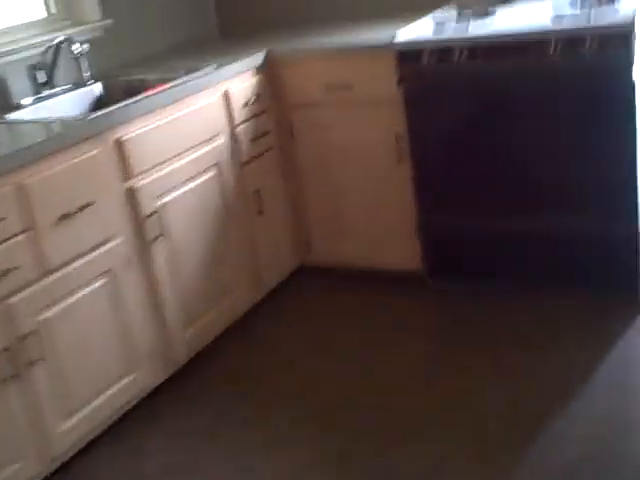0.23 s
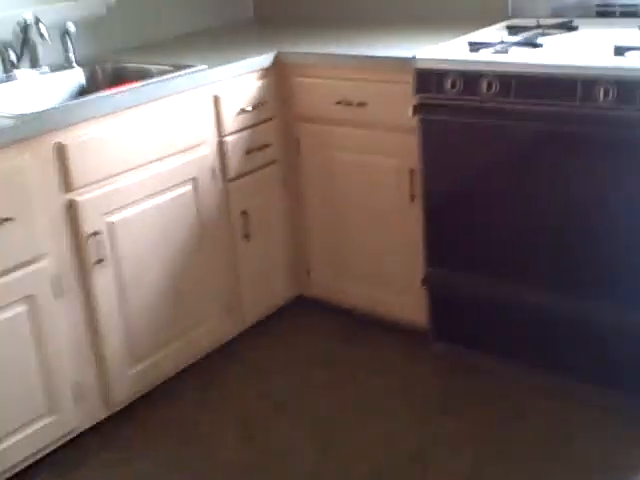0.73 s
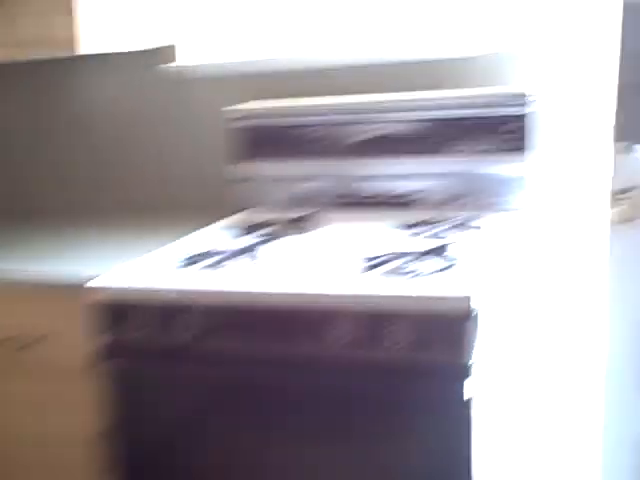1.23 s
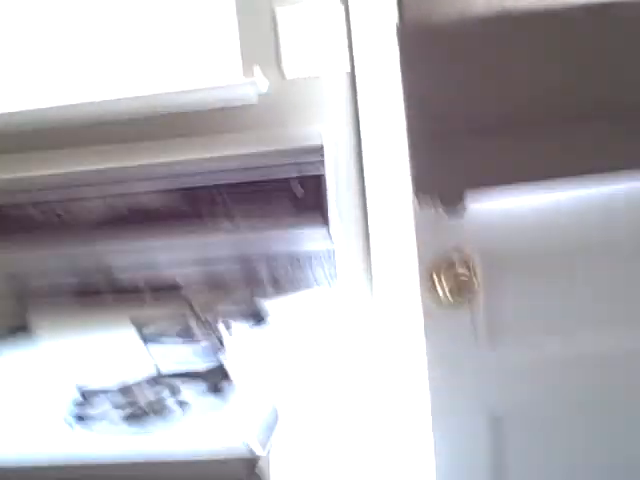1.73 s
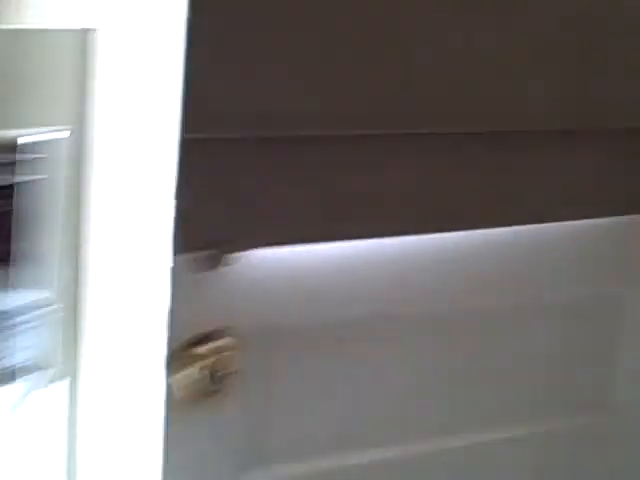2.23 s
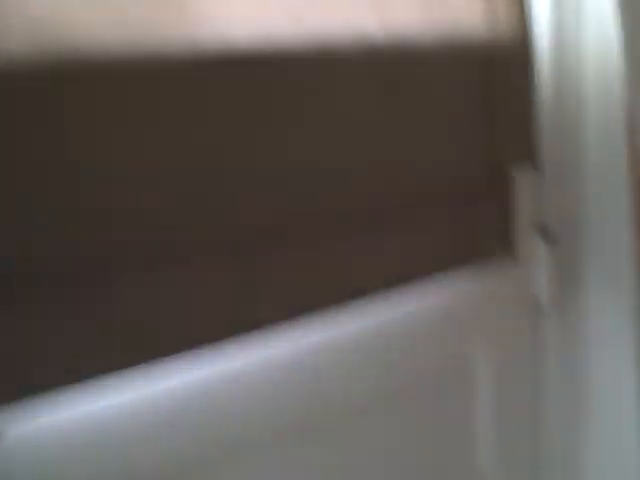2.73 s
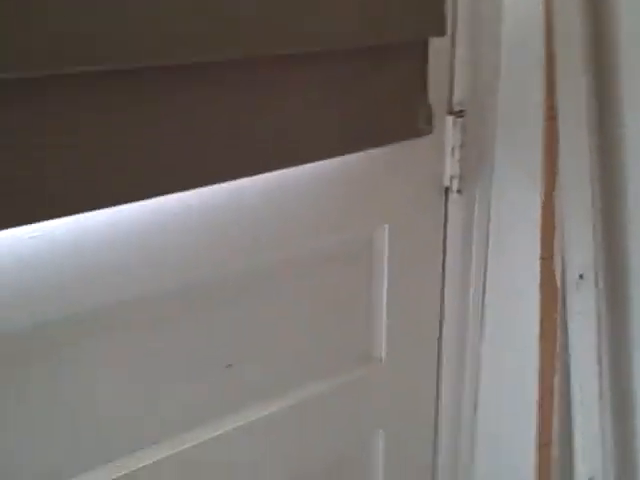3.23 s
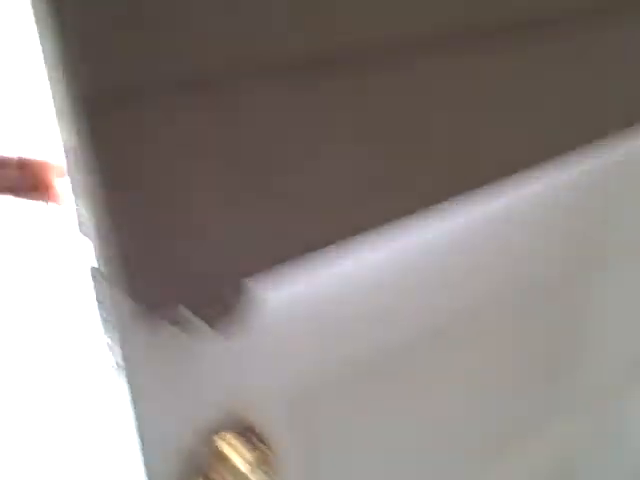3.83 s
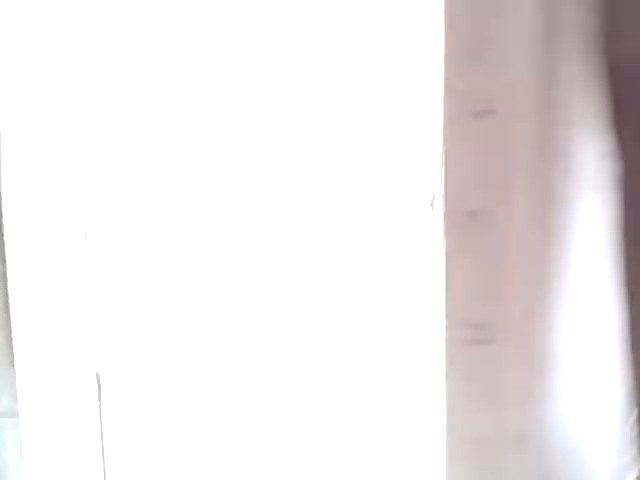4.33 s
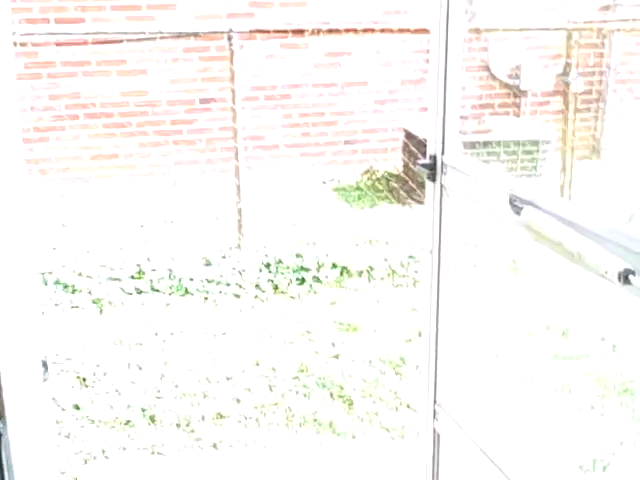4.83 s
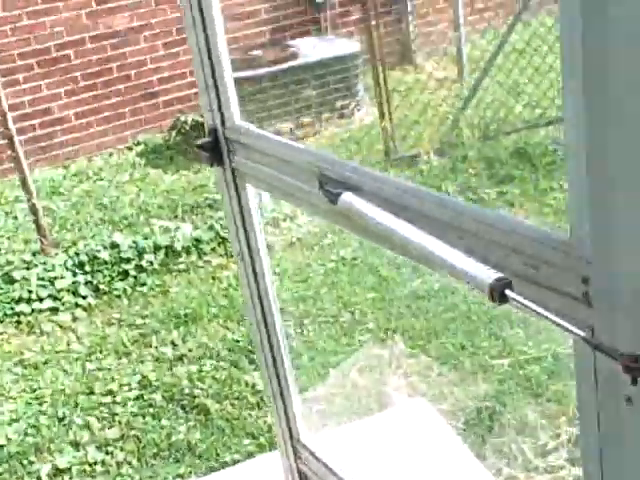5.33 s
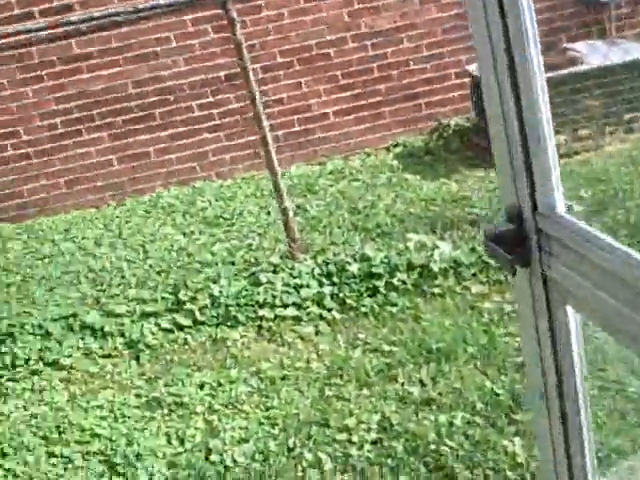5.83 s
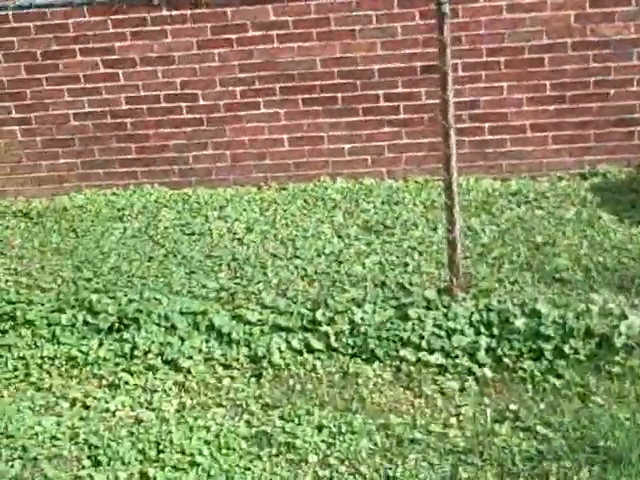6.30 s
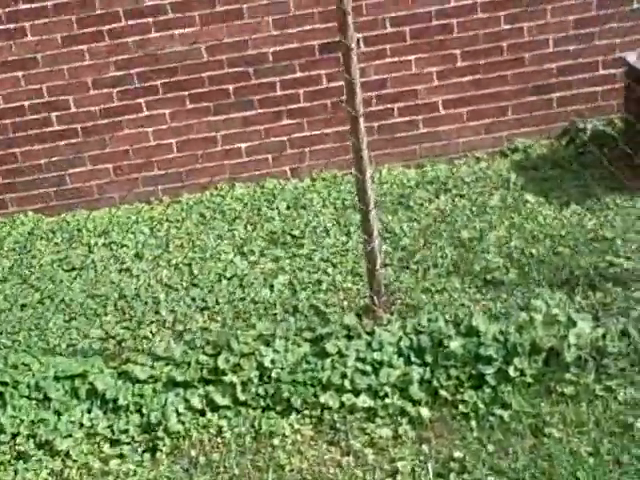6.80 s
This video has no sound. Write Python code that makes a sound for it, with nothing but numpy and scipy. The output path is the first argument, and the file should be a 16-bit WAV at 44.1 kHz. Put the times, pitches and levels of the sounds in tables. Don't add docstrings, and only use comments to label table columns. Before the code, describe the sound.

A door slams hard in an empty, echoing kitchen, footsteps knock over creaking boards, then gritty steps lead out into growing traffic and fan hum.

```python
import sys
import numpy as np
from scipy import signal
from scipy.fft import rfft, irfft, next_fast_len
from scipy.io import wavfile
from scipy.ndimage import uniform_filter1d, map_coordinates

SR = 44100
rng = np.random.default_rng(int(sys.argv[2]) if len(sys.argv) > 2 else 0)


def volts(x):
    e = np.asarray(x, float) / 20
    return 10 ** e


def digitize_waveform(pressure):
    field = np.atleast_2d(pressure).T
    bounded = np.clip(field, -1, 1)
    quanta = np.round(bounded * 32767).astype(np.int16)
    wavfile.write(sys.argv[1], SR, quanta)


N = 311346

# time_s, level_db
PASSAGE = [(0, -51.5), (.27, -64.5), (1.3, -58.5), (1.6, -60.5), (2.21, -62), (2.4, -51), (2.8, -57),
           (3.5, -54), (3.74, -54), (4.12, -54), (4.7, -50), (5.0, -45.5), (5.42, -51), (5.89, -50),
           (6.2, -55), (6.61, -55), (7.06, -48)]


def unit(x):
    return x / np.sqrt(np.mean(x ** 2) + 1e-20)


def along(points, hz):
    f, v = np.transpose(points)
    return np.interp(np.log(hz + 1), np.log(f + 1), v)


def curves(rows):
    s, *cols = np.transpose(rows)
    return [np.interp(np.arange(N) / SR, s, c) for c in cols]


def wobble(rate, size=N):
    knots = rng.standard_normal(int(N * rate / SR) + 4)
    return map_coordinates(knots, [np.arange(size) * rate / SR])


def coloured(x, gain):
    m = next_fast_len(len(x) + 8192)
    return irfft(rfft(x, m) * gain(np.fft.rfftfreq(m, 1 / SR)), m)[:len(x)]


def rush(spectrum, patchy_db):
    z = signal.stft(rng.standard_normal(N + 512), nperseg=512)[2]
    field = uniform_filter1d(rng.standard_normal(z.shape), 6, 0)
    field = uniform_filter1d(field, 14, 1)
    x = signal.istft(z * volts(patchy_db * unit(field)), nperseg=512)[1][:N]
    return unit(coloured(x, lambda hz: volts(along(spectrum, hz))))


def add(track, s, sound):
    part = track[round(s * SR):][:len(sound)]
    part += sound[:len(part)]


def fading_tone(t, db, hz, t60, attack):
    return -volts(db - 60 * t / t60) * np.sin(2 * np.pi * hz * t) * (1 - np.exp(-t / attack))


def strokes(rows):
    t = np.arange(N) / SR
    total = 0
    for s, db, rise, hold, fade in rows:
        climb_db = 20 * np.maximum(s - t, 0) / rise
        fall_db = fade * np.maximum(t - s - hold, 0)
        total = total + volts(db - climb_db - fall_db)
    return total


def hit(track, s, db, room_db, length, gain, attack=0.00081, ring=0):
    # pitch_hz, t60_s
    kitchen = [(60, 0.99), (150, 0.75), (500, 0.82), (2000, 0.84), (6000, 0.76), (14000, 0.56)]
    doorstep_s, outdoor_share = 4.5, 0.3
    t = np.arange(SR // 8) / SR
    x = coloured(rng.standard_normal(len(t)), gain)
    x = x * volts(-60 * t / length) * (1 - np.exp(-t / attack))
    x = x / np.abs(x).max() + ring
    hz, u, z = signal.stft(rng.standard_normal(SR), SR, nperseg=256)
    t60 = along(kitchen, hz)[:, None] * (1 if s < doorstep_s else outdoor_share)
    tail = coloured(signal.istft(z * volts(-60 * u / t60), SR, nperseg=256)[1], gain)
    tail *= volts(1.46 * wobble(71.6, size=len(tail)))
    tail *= 1 - np.exp(-np.arange(len(tail)) / SR / 0.0027)
    add(track, s, volts(db) * x)
    add(track, s, volts(db + room_db) * tail * np.linalg.norm(x) / np.linalg.norm(tail))


def rumble():
    # pitch_hz, level_db
    rumble_colour = [(26, -44), (45, -0.5), (73, 2.5), (130, -10.5), (170, -36), (290, -120)]
    calm_db, open_db, opens_s, opening_s = -59, 7, 2.6, 0.12
    t = np.arange(N) / SR
    level_db = calm_db + open_db / (1 + np.exp((opens_s - t) / opening_s))
    return volts(level_db + 2.1 * wobble(6)) * rush(rumble_colour, patchy_db=1.8)


def murmur():
    # pitch_hz, level_db
    murmur_colour = [(59, -31), (100, -3.5), (173, -0.5), (205, -3), (264, -2.5), (303, -4.5), (354, -8),
                     (399, -11), (450, -13), (580, -28), (990, -120)]
    level_db = curves(PASSAGE)[0]
    return volts(level_db + 0.78 * wobble(7.4)) * rush(murmur_colour, patchy_db=0.5)


def traffic():
    # time_s, level_db
    traffic_level = [(0, -64), (.1, -59), (.3, -66), (1.3, -58.5), (1.51, -64), (1.73, -57), (2.1, -62.5),
                     (2.34, -55), (2.6, -58.5), (2.9, -58), (3.3, -55), (3.6, -58.5), (4.12, -58.5),
                     (5.0, -51), (5.42, -53), (6.1, -51), (6.55, -50.5), (7.06, -44)]
    # pitch_hz, level_db
    traffic_colour = [(180, -43.5), (300, -19), (354, -3.5), (403, -29), (475, 1), (876, 2.5), (1060, 0),
                      (1730, -2.5), (2040, -5), (2560, -9.5), (5000, -30.5), (6500, -44), (11000, -120)]
    level_db = curves(traffic_level)[0]
    return volts(level_db + 0.23 * wobble(3.43)) * rush(traffic_colour, patchy_db=1.5)


def air_hiss():
    # pitch_hz, level_db
    air_colour = [(1470, -20), (2500, -6.5), (3380, -4.5), (4130, -3.5), (4970, -7), (7710, -13),
                  (9070, -17), (15800, -17)]
    middle_db, murmur_middle_db, follow = -67.5, -55, 0.31
    draught_s, draught_width_s, draught_db = 4.9, 0.77, 2.5
    t = np.arange(N) / SR
    level_db = middle_db + follow * (curves(PASSAGE)[0] - murmur_middle_db)
    level_db += draught_db * np.exp(-((t - draught_s) / draught_width_s) ** 2)
    return volts(level_db + 1.5) * rush(air_colour, patchy_db=1.5)


def drone():
    # time_s, pitch_hz, level_db
    drone_path = [(2.75, 295, -70), (2.9, 292, -52.5), (3.1, 278, -54.5), (3.3, 280, -60.5),
                  (3.45, 280, -55), (3.7, 278, -56.5), (3.95, 255, -58.5), (4.08, 270, -63.5),
                  (4.25, 272, -51), (4.45, 265, -54.5), (4.6, 268, -51.5), (4.8, 262, -55.5),
                  (5.0, 245, -58), (5.2, 272, -46.5), (5.35, 250, -60), (5.5, 255, -48), (5.7, 250, -57),
                  (5.9, 250, -75)]
    breath_hz, steady_share = 28, 1.1
    start = (0, drone_path[0][1], -120)
    end = (N / SR, drone_path[-1][1], -120)
    hz, level_db = curves([start, *drone_path, end])
    flutter = volts(2.2 * wobble(6.1))
    breathy = unit(wobble(breath_hz)) + 1j * unit(wobble(breath_hz)) + steady_share
    tone = (breathy * np.exp(2j * np.pi * np.cumsum(hz) / SR)).real
    return volts(level_db) * unit(flutter * tone)


def engine_hum():
    # time_s, pitch_hz, level_db
    engine_path = [(6.45, 143.6, -56), (6.494, 140, -52), (6.54, 157.1, -56), (6.65, 159.2, -54.5),
                   (6.806, 161.4, -51), (6.916, 163, -51.5), (7.06, 163.6, -50.5)]
    # pitch_multiple, level_db
    engine_orders = [(.5, -6), (1.5, -4.5), (3, -13)]
    hz, level_db = curves([(engine_path[0][0] - .2, engine_path[0][1], -90), *engine_path])
    phase = 2 * np.pi * np.cumsum(hz) / SR
    hum = sum(volts(db) * np.sin(k * phase) for k, db in [(1, 0), *engine_orders])
    return 1.44 * volts(level_db + .8 * wobble(13)) * hum


def insects():
    # time_s, level_db
    insect_level = [(4, -90), (4.5, -78), (5.0, -77), (5.8, -69.5), (6.3, -70.5), (6.8, -71.5), (7.06, -68)]
    chorus = rush([(5500, -30), (6600, -5), (7200, -6), (7780, 1), (8100, -5), (8700, -13),
                   (9400, -7), (10500, -30)], patchy_db=1.0)
    return volts(curves(insect_level)[0]) * chorus


def chirps():
    # start_s, length_s, pitch_hz, level_db
    calls = [
        (.1, 0.055, 4900, -72),
        (.3, 0.088, 5230, -71),
        (5.1, .06, 11000, -73),
        (5.3, .12, 12500, -77),
        (6.05, 0.092, 9200, -78),
        (6.268, 0.073, 9300, -73),
        (6.68, .15, 12200, -74),
        (3.3, .2, 11800, -73),
    ]
    out = np.zeros(N)
    for s, length, centre_hz, db in calls:
        n = round(length * SR)
        band = coloured(rng.standard_normal(SR // 4), lambda hz: np.exp(-((hz / centre_hz - 1) / 0.035) ** 2))
        add(out, s, volts(db) * unit(band)[:n] * np.hanning(n))
    return out


def sway():
    # centre_s, level_db, half_width_s
    swells = [(.13, -47, 0.06), (.9, -46, 0.54), (1.859, -43.5, 0.078), (2.3, -47.5, 0.29),
              (4.4, -52, 0.77), (4.78, -39, 0.18), (5.2, -45, 0.11), (5.4, -48, 0.065), (5.63, -55, 0.14),
              (5.95, -49, .08), (3.65, -51, 0.2), (6.3, -58, 0.3), (6.8, -56.5, 0.24)]
    calm_db = -60.5
    swing = rush([(8, -13.5), (16, -7.0), (26, -7.5), (40, -3.0), (60, -36.0), (90, -97.0)], patchy_db=0.3)
    t = np.arange(N) / SR
    level = volts(calm_db)
    level = level + sum(volts(db) * np.exp(-((t - s) / width) ** 2) for s, db, width in swells)
    return level * swing


def rustle():
    # full_s, level_db, rise_s, hold_s, fade_db_per_s
    brushes = [
        (5.8, -61, .05, .04, 80),
        (5.89, -59.5, .08, 0.059, 40),
        (3.31, -64.5, .15, .1, 62),
        (2.74, -54, .03, .03, 60),
        (1.5, -69, .05, .05, 80),
    ]
    # pitch_hz, level_db
    leaf_colour = [(1200, -28), (2200, 0), (3500, 0), (5000, -3), (6800, -7), (8500, -22), (12000, -40)]
    grain = volts(1.5 * wobble(90))
    return strokes(brushes) * unit(grain * rush(leaf_colour, patchy_db=2.0))


def scuffs():
    # full_s, level_db, rise_s, hold_s, fade_db_per_s
    drags = [(0, -62, 0.0092, 0.046, 35), (1.29, -61, 0.91, 0.022, 17), (1.98, -72, .06, 0.045, 123),
             (2.272, -59.5, 0.03, 0.18, 117), (2.674, -43.5, 0.012, 0.016, 85),
             (2.823, -56, 0.067, 0.017, 300), (3.36, -63.5, 0.12, 0.1, 395), (4.35, -70, 0.079, 0.041, 60),
             (4.532, -68, .04, .01, 140), (4.992, -62.5, .04, .02, 46), (5.572, -74, 0.063, .01, 117),
             (5.706, -57, .003, .012, 200), (5.826, -56, 0.12, .022, 300), (5.916, -58, 0.006, .012, 110),
             (6.64, -64.5, 0.11, 0.32, 100), (6.995, -57, .012, 0.061, 100)]
    # pitch_hz, level_db
    sole_colour = [(350, -18), (600, -13), (880, -5), (1050, 0), (1260, -6.5), (2030, -7.5), (2980, -4),
                   (6230, -10), (15800, -17.5)]
    grain = volts(1.5 * wobble(60))
    return strokes(drags) * volts(1.5) * unit(grain * rush(sole_colour, patchy_db=1.4))


def moans():
    # start_s, length_s, pitch_hz, level_db
    creaks = [
        (3.55, .25, 171, -55),
        (3.55, 0.25, 352, -54.5),
        (4.22, 0.24, 181.4, -59),
        (4.74, 0.16, 358, -49.5),
        (4.86, 0.47, 181, -50.5),
        (5.32, 0.14, 177, -46),
        (5.1, 0.21, 334, -57.5),
    ]
    out = np.zeros(N)
    for s, length, hz, db in creaks:
        u = np.arange(round(length * SR)) / SR
        rough = volts(2.5 * wobble(35, size=len(u)))
        tone = np.sin(2 * np.pi * hz * u * (1 - 0.052 * u))
        add(out, s, volts(db + 0.5) * rough * np.sqrt(np.hanning(len(u))) * tone)
    return out


def floor_bounce():
    # start_s, level_db, pitch_hz, t60_s
    bounces = [(0.128, -38, 62, 0.21), (1.114, -18, 25.5, 0.18), (1.707, -17.5, 27.7, 0.3),
               (1.8, -27.5, 11.3, 0.43), (2.3, -25, 23.6, 0.39), (2.367, -23, 21, 0.25),
               (2.722, -24, 24, 0.26), (2.869, -34.5, 60, 0.68), (2.922, -38, 89, 0.35),
               (4.759, -15, 42, 0.048), (4.959, -33, 19.3, 0.67), (5.785, -32, 34, .19)]
    out, t = np.zeros(N), np.arange(SR // 2) / SR
    for s, db, hz, t60 in bounces:
        add(out, s, fading_tone(t, db, hz, t60, 1 / (hz * 3.3)))
    return out


def steps():
    # start_s, peak_db, knock_hz, t60_s, room_db
    footfalls = [(0.134, -46.5, 155, 0.061, -3), (1.079, -37, 488, 0.11, -4), (1.094, -39, 250, 0.081, 4),
                 (1.199, -41, 220, 0.053, -5), (1.682, -43, 410, 0.078, 7), (1.685, -38.5, 276, 0.12, 6.5),
                 (1.699, -43, 243, 0.034, -16), (2.347, -46, 293, 0.047, 7.5), (2.443, -42, 180, 0.15, -7),
                 (2.6546, -34, 269, 0.15, -2), (2.7016, -28.5, 276, 0.12, -6), (2.7185, -31.5, 274, 0.11, -4),
                 (2.746, -34, 258, 0.15, -12), (2.868, -43, 302, 0.045, 6), (3.59, -48.5, 326, 0.09, 4.5),
                 (4.9667, -39, 325, .06, 0), (6.491, -33, 917, 0.04, -7), (6.983, -45, 800, 0.041, 3.5),
                 (7.009, -36, 1430, 0.036, -0.5),
                 (5.7011, -32.5, 432, 0.05, -1.5),
        (5.7896, -38.5, 550, 0.03, -10),
    ]
    knock_delay_s = .0028
    out, u = np.zeros(N), np.arange(SR // 8) / SR
    for s, db, knock_hz, t60, room_db in footfalls:
        hump = lambda hz: volts(-9 * np.log2((hz + 20) / knock_hz) ** 2) + volts(-19.0) / (1 + (hz / 3000) ** 2)
        board = -np.sin(2 * np.pi * knock_hz * u) + 0.05 * np.sin(2 * np.pi * 0.99 * knock_hz * u)
        ring = 1.1 * board * volts(-60 * u / t60) * (1 - np.exp(-u / 0.0015))
        hit(out, s + knock_delay_s, db, room_db, t60, hump, 0.00043, ring)
    return out


def pebble():
    out = np.zeros(N)
    humps = lambda hz: .4 / (1 + ((hz - 2700) / 350) ** 2) + 1.0 / (1 + ((hz - 1400) / 250) ** 2)
    hit(out, 6.4945, -33, -10, 0.018, humps)
    return out


def ticks():
    # start_s, peak_db, centre_hz, room_db, fall_db an octave off centre
    rail = [(0.0024, -44, 6330, 7, 8), (0.807, -35.5, 4290, 4.5, 4.5), (0.9988, -37, 4120, 4, 2),
            (1.006, -40, 4330, 9, 9), (1.165, -37, 8000, 5.5, 1), (1.2935, -41, 5770, 3, 9),
            (1.406, -43.5, 4760, 6.5, 6), (1.4965, -43, 6520, 5.5, 2), (1.7013, -46, 5400, 9, 7),
            (1.794, -42, 5100, 3, 3), (2.261, -48.5, 6360, 15.5, 6), (2.66, -37.5, 5940, 17.5, 4),
            (2.686, -29.5, 6060, -1, 11), (2.821, -44, 4500, 0, 4), (3.241, -52, 5000, 3, 1),
            (3.295, -48.5, 3970, -3, 13), (3.836, -46, 4050, -4, 5)]
    # start_s, peak_db, centre_hz, fall_db
    sand = [
        (4.992, -45, 4030, 2),
        (5.7045, -46, 4590, 8),
        (5.792, -45, 5090, 6),
        (5.824, -40, 13000, 5),
        (6.3824, -49, 4595, 4),
        (6.3994, -51, 9000, 4),
        (6.986, -44, 6450, 12),
        (7.003, -40.5, 5800, 27),
    ]
    grit = [
        (5.9142, -33, 5000, 1.5),
        (5.825, -42, 3300, 8),
        (6, -51, 6300, 12),
    ]
    contacts = list(rail)
    for rows, room_db in ((sand, 1), (grit, -22)):
        contacts += [(s, db, hz, room_db, fall) for s, db, hz, fall in rows]
    out = np.zeros(N)
    for s, db, centre_hz, room_db, fall_db in contacts:
        hump = lambda hz: volts(-fall_db * np.log2((hz + 20) / centre_hz) ** 2)
        hit(out, s, db, room_db, 0.014, hump, attack=0.00084)
    return out


def clinks():
    # start_s, level_db, pitch_hz, t60_s
    rings = [(.4171, -10, 1974, .02), (.4173, -14, 5400, .012), (.4172, -15, 3850, .014),
             (.4174, -15, 4700, .012), (.417, -20, 2900, .014), (.4172, -22, 7900, .012),
             (.45, -16.5, 720, .12), (.436, -21, 4200, 0.028), (0.48, -11, 2460, 0.025),
             (.4767, -17, 3400, 0.025), (.4775, -15, 1160, 0.071), (.494, -18, 3540, .015),
             (.4905, -15, 900, 0.029), (.502, -14, 305, 0.11), (.535, -15.5, 515, 0.13),
             (0.6484, -21.5, 1760, 0.058), (1.0835, -37, 530, 0.074), (2.6578, -37, 380, .04),
             (2.6598, -45, 2350, .025), (2.6745, -33, 300, .07), (2.7285, -30, 270, .05),
             (2.707, -40, 950, .05), (2.675, -38, 6400, .03), (2.8, -43, 4300, .025),
             (5.7041, -30, 483, .05), (5.7164, -34.5, 310, 0.043), (5.792, -48, 3200, .02),
             (5.7931, -38, 740, 0.038), (5.7928, -41, 432, .04), (5.7045, -41, 950, 0.055),
             (5.9, -51, 11500, .02), (6.9855, -34, 755, .06), (6.9858, -43, 295, .07),
             (6.991, -40, 1880, .05), (6.986, -40, 3350, .03), (6.989, -43, 3800, .03),
             (7.003, -45, 600, 0.037), (7.006, -41, 1020, .04), (7.005, -42, 1900, .03),
             (7.011, -36, 1600, .05), (7.028, -41, 630, .05), (7.038, -42, 1100, 0.037),
             (7.055, -38, 1800, .03), (6.4945, -38, 1400, .05), (6.495, -40, 1130, .04),
             (6.497, -42.5, 883, .09)]
    out, t = np.zeros(N), np.arange(SR // 8) / SR
    for s, db, hz, t60 in rings:
        add(out, s, fading_tone(t, db, hz, t60, 0.00027))
    return out


def pushes():
    # centre_s, peak_db, half_width_ms, direction
    blunt = [(.4478, -11, .5, -1), (.4525, -12, .5, -1), (.471, -9, .6, -1), (.4855, -11, .5, -1),
             (.4925, -10, .5, -1), (.503, -10, .5, -1), (.5065, -5, .6, -1), (.519, -11, .5, -1),
             (.5405, -10, .5, -1), (.556, -14, .4, -1), (4.9595, -28, .45, 1), (4.9617, -26, .4, 1),
             (4.9687, -33, .6, -1), (5.7046, -31, .45, -1), (5.7925, -33, .3, 1), (6.9858, -36, .25, -1),
             (6.9897, -34, .25, -1), (7.0111, -30, .25, -1)]
    half = 220
    out, ms = np.zeros(N), np.arange(-half, half + 1) / SR * 1000
    for s, db, width_ms, direction in blunt:
        add(out, s - half / SR, direction * volts(db) * np.exp(-(ms / width_ms) ** 2))
    return out


def puffs():
    # centre_s, level_db, pitch_hz
    air_pulses = [
        (0.402, -29, 60),
        (0.413, -12.5, 110),
    ]
    out, t = np.zeros(N), np.arange(SR // 10) / SR
    for s, db, hz in air_pulses:
        add(out, s - .02, -volts(db) * np.exp(-((t - .02) * hz * 4.1) ** 2))
    return out


def thumps():
    # start_s, level_db, pitch_hz, t60_s
    booms = [(.423, -19.5, 86.3, 0.85), (.445, -21, 86, .2), (.48, -11.5, 82, .12), (.515, -24, 78, .7),
             (.64, -26, 81.7, 0.43), (.74, -32, 78.2, 0.31), (.425, -16, 141.4, 0.3),
             (.462, -19, 170, 0.11), (0.4753, -14, 160, 0.076), (0.4901, -8, 180.5, 0.1),
             (0.505, -11, 169, 0.11), (0.5258, -7, 186, 0.097), (.568, -18, 170, .2),
             (.615, -24.5, 190.5, 0.43), (.675, -22, 163, .15), (.4885, -26, 45, .4), (.45, -24, 62, .4),
             (.44, -19, 200, .2), (.445, -21, 45, .3)]
    out, t = np.zeros(N), np.arange(SR) / SR
    for s, db, hz, t60 in booms:
        add(out, s, fading_tone(t, db, hz, t60, 0.0037))
    return out


def bolt():
    bolt_times = (.4105, .4165)
    # peak_db, room_db, length_s
    latch = [
        (-33, -6, .04),
        (-6.5, 6, 0.011),
    ]
    # pitch_hz, level_db
    bolt_colour = [(350, -27), (700, -12), (1350, -6), (1970, -3), (3270, -6), (5580, -5.5), (6900, -14),
                   (7900, -12.5), (9500, -22), (12000, -22), (15800, -23)]
    out = np.zeros(N)
    for s, contact in zip(bolt_times, latch):
        hit(out, s, *contact, lambda hz: volts(along(bolt_colour, hz)), 0.00044)
    return out


def slam():
    # start_s, peak_db, panel_ring_db, room_db, length_s
    contacts = [
        (0.421, -14.5, -4, 5.5, 0.17),
        (.445, -14.5, -2.5, 11, 0.063),
        (0.4769, -1.5, -10.5, 4.5, 0.036),
        (.494, -10, -10, 5, 0.058),
        (.505, -9, -7.5, 4.5, 0.073),
        (0.521, -12.5, -14, 4.5, 0.18),
    ]
    # pitch_hz, level_db, t60_s
    panel = [(651, -8, 0.38), (1338, -14, 0.46), (1630, -18, 0.4), (196.7, -7.5, 0.85), (312, -3.5, 0.64),
             (378, -2.5, 0.4), (486.6, 1, 0.43), (564, -6, 0.27), (725, -0.5, 0.37), (750, -12, 0.48),
             (1153, -15, 1), (1762, -12.5, 0.7)]
    # pitch_hz, level_db
    bang_colour = [(25, -26), (60, -10), (115, -12), (160, -12), (270, -9.5), (500, -9), (790, -13),
                   (1060, -11.5), (2300, -17), (4400, -19), (4900, -28), (7600, -28), (8600, -34),
                   (11000, -37.5), (12200, -35.5), (15800, -44)]
    loose_tilt_db, seated_tilt_db, seating_db_per_s = -4, 0.28, 103
    out, t = np.zeros(N), np.arange(SR) / SR
    for s, db, ring_db, room_db, length in contacts:
        tilt_db = min(loose_tilt_db + seating_db_per_s * (s - contacts[0][0]), seated_tilt_db)
        bang = lambda hz: volts(along(bang_colour, hz) + tilt_db * np.log2(hz / 1000 + 0.032))
        hit(out, s, db, room_db, length, bang, 0.00044)
        ring = np.zeros(SR)
        for hz, level, t60 in panel:
            ring += volts(level + rng.normal(0, 0.93) - 60 * t / t60) * np.sin(2 * np.pi * hz * t)
        add(out, s, volts(db + ring_db - 7.0) * ring * (1 - np.exp(-t / 0.0019)))
    return out


def scene():
    outside = rumble() + murmur() + traffic() + air_hiss() + drone() + engine_hum() + insects() + chirps()
    walker = sway() + rustle() + scuffs() + moans() + floor_bounce() + steps() + pebble()
    contacts = ticks() + clinks() + pushes()
    door = puffs() + thumps() + bolt() + slam()
    return (outside + walker + contacts + door)[None]


def band_limit(x):
    return signal.sosfilt(signal.butter(12, 15830, fs=SR, output="sos"), x)


def record(dry):
    held = dry / (1 + np.abs(dry / .72) ** 6) ** (1 / 6)
    held = coloured(held[0], lambda hz: hz < 15850)[None]
    return band_limit(held)


dry = scene()
out = record(dry)
digitize_waveform(out)
```